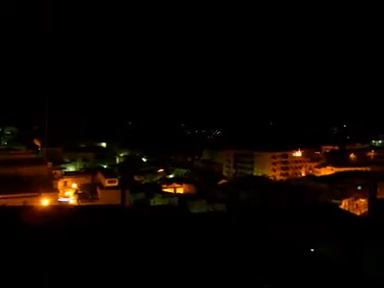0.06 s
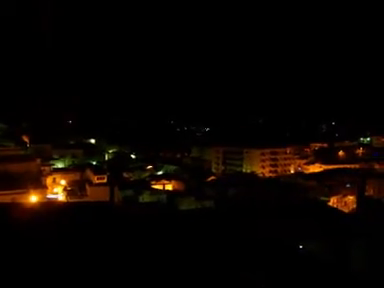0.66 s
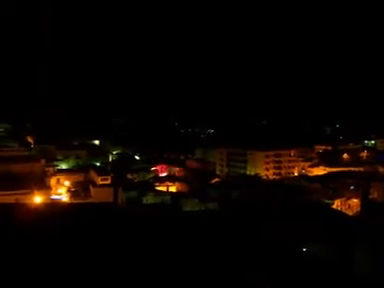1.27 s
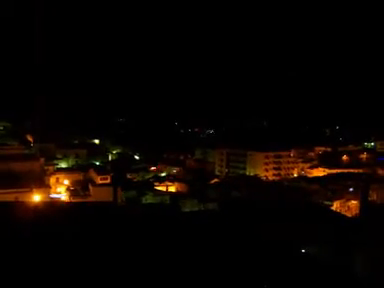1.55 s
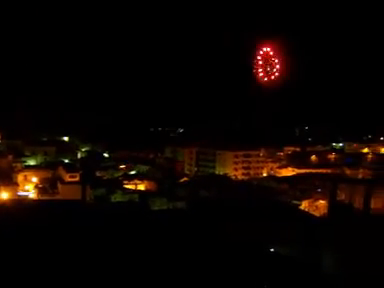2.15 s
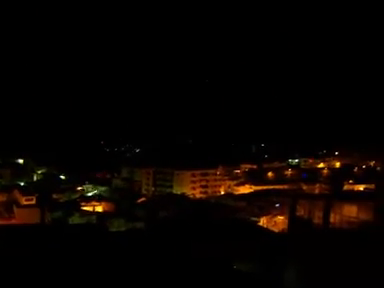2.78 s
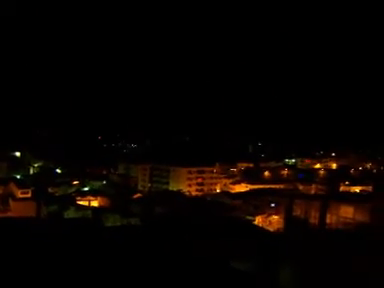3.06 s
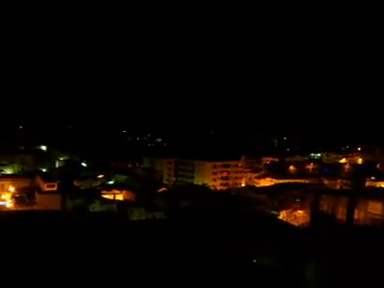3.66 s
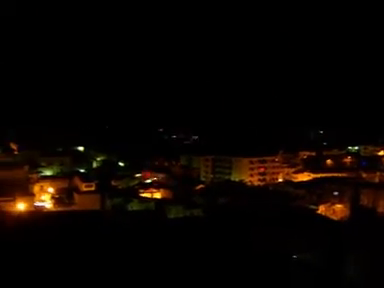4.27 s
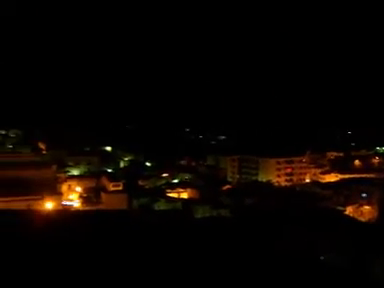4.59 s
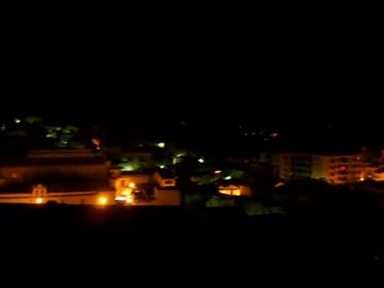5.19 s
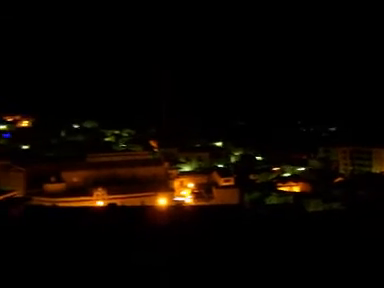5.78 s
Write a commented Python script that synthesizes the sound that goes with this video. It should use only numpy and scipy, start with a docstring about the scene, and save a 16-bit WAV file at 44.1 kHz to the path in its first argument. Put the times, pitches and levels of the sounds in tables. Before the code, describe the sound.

Fireworks go off over a town at night, heard from a hillside. Small firecracker pops and faint crackling come first, then shells burst louder and louder, slapping off buildings and rolling through the valley. The biggest adds a deep boom that overloads the microphone. A row of sharp shots follows, about two a second, with another loud burst near the end, all over a low town rumble.

```python
"""Fireworks over a town at night, heard from a hillside.
First a shell's bang rolls away through the valley, while burning pellets crackle and the town rumbles.
Firecrackers pop in the streets. More shells burst and slap back off buildings; a heavy one adds a boom.
From 1.8 s a battery (a box of firework tubes) fires a row of shots. Between them the biggest shells
burst, with pressure waves that overload the microphone. The sound stops short just after the last shot."""
import sys
import numpy as np
from scipy import signal
from scipy.fft import rfft, irfft, next_fast_len
from scipy.io import wavfile

SR = 44100
rng = np.random.default_rng(int(sys.argv[2]) if len(sys.argv) > 2 else 0)


def dump_mix(stems):
    """Bounce the given channels to the path in sys.argv[1] as a 16-bit WAV at rate SR."""
    frames = np.atleast_2d(stems).T  # one column per channel
    limited = np.clip(frames, -1, 1)  # hard clip at full scale
    pcm = np.round(limited * 32767).astype(np.int16)
    wavfile.write(sys.argv[1], SR, pcm)


N = 261954

# Shell bursts. "Clutter" is the dense mix of echoes from nearby streets; the "roll" comes from the hills.
# t/s, blast level/dB, echo f/Hz, clutter level/dB, clutter hold/s, roll level/dB, bass/dB, treble/dB
SHELL_BURSTS = [(-0.15, -10, 644, -28, 0.19, -26.5, 9, 2), (0.422, -9, 432, -23.5, 0.15, -23, 10, -7.5),
                (0.788, 0.5, 570, -21.5, 0.023, -30.5, 12.5, -4),
                (1.4022, 6.5, 678, -12.5, 0.31, -14.5, -5.5, -5.5),
                (2.1729, 10, 555, -9.5, 0.15, -16.5, -1.5, -7),
                (2.6293, 17, 451, -5.5, 0.04, -12.5, 9.5, -3), (5.3761, 10, 631, -12.5, 0.27, -11, -2, -4)]
# Tone of a shell's tail, for a shell pitched at SHELL_HZ: f/Hz, relative level/dB
SHELL_SPECTRUM = [(30, -22), (80, -25.5), (140, -13.5), (220, -10), (320, -6), (480, -0.5), (700, -1),
                  (880, -3.5), (1200, -15.5), (2000, -19.5), (3000, -24.5), (4500, -32.5), (7000, -36.5),
                  (13000, -45.5)]
# Loud echoes off large buildings: t/s, level/dB, smear/s
BUILDING_SLAPS = [(0.7906, -3, 0.0056), (1.4127, 10.5, 0.0058), (1.426, 4, 0.0043), (1.4945, 9.5, 0.007),
                  (1.526, -0.5, 0.0044), (1.5535, 2.5, 0.0052), (1.568, 0.5, 0.015), (1.6495, 7, 0.0051),
                  (2.1885, 5, 0.0047), (2.209, 4.5, 0.0032), (2.224, 5, 0.01), (2.2665, 1, 0.0044),
                  (2.2805, 2, 0.0056), (2.6336, 5, 0.014), (2.6645, 13.5, 0.0055), (2.7345, -2, 0.00094),
                  (5.402, 8, 0.0013), (5.414, 1.5, 0.0031), (5.4645, -1, 0.0033), (5.478, 5.5, 0.012),
                  (5.528, 3.5, 0.0033), (5.5395, 8, 0.006)]
# Clouds of burning pellets, called stars: t/s, burn time/s, snap rate/Hz, smallest snap at full glow/dB
STAR_CLOUDS = [(-0.1, 0.3, 240, -25), (1.0, 0.3, 190, -31), (2.95, 0.2, 530, -20.5),
               (3.42, 0.43, 93, -26.5)]
# Tone of the town's steady wash of noise: f/Hz, relative level/dB
TOWN_SPECTRUM = [(20, 6), (60, -3), (115, 1.5), (250, -6), (450, -7), (700, 2.5), (1200, -13.5),
                 (2200, -18.5), (4000, -28.5), (7000, -40), (11000, -41), (14000, -77)]
# Rise and fall of the low rumble, staying at the last value: t/s, level/dB (before RUMBLE_TRIM_DB)
RUMBLE_CURVE = [(0.0, -37), (0.28, -41), (0.83, -32.5), (1.05, -40), (2.55, -44)]
# Firecrackers, from dull pops to bright snaps: t/s, level/dB, f/Hz
FIRECRACKERS = [(0.1056, -12.5, 2200), (0.131, -19, 1890), (0.2805, -16, 580), (0.317, -24, 2100),
                (0.4513, -5, 640), (0.4693, -1, 940), (0.771, -20, 1700), (1.2149, -19, 1820),
                (3.4759, -7, 610), (4.163, -9, 685), (4.216, -12, 289), (4.436, -11.5, 540)]
# Deep thuds of the heaviest bursts: t/s, level/dB, f/Hz
HEAVY_BOOMS = [(0.793, -20.5, 111), (2.636, 1, 229)]
# Shots of the battery: t/s, level/dB
BATTERY_SHOTS = [(1.8006, 1), (2.7995, -0.5), (3.2617, -0.5), (3.7385, -0.5), (4.1264, 1), (4.5706, -1),
                 (4.9915, -2), (5.7922, -0.5)]
# Tone of a shot's tail: f/Hz, relative level/dB
SHOT_SPECTRUM = [(40, -10.5), (120, -14.5), (230, -3), (500, 1.5), (760, 1), (1000, -6), (1400, -17.5),
                 (2000, -20.5), (3000, -26.5), (5000, -35), (9000, -40), (14000, -53)]

SHELL_HZ = 600  # a typical shell; the others are tuned against it
TOWN_DB, RUMBLE_TRIM_DB = -38, 2
END_S = 5.837


def from_db(db):
    """Turn decibels into a number to multiply a sound by."""
    return 10 ** (np.asarray(db) / 20)


def fade(t, t60):
    """Stay at 1 until t = 0, then lose 60 dB every t60 seconds."""
    return from_db(-60 * np.maximum(t, 0) / t60)


def butter(x, hz, kind, order=2):
    """A Butterworth filter: keep the lows, the highs or a band, or cut a band out."""
    return signal.sosfilt(signal.butter(order, hz, kind, fs=SR, output="sos"), x)


def hollow(x, hz, db, width=1.0):
    """A resonance lifts the pitches around hz, which sounds hollow."""
    return x + (from_db(db) - 1) * signal.lfilter(*signal.iirpeak(hz, 1 / width, fs=SR), x)


def add(out, s, sound):
    """Mix a sound in, starting at s seconds."""
    at = round(s * SR)
    sound = sound[max(-at, 0):N - at]
    out[max(at, 0):max(at, 0) + len(sound)] += sound


def noise(spectrum, shift=1):
    """Noise of average power 1 with the given tone, its pitch multiplied by shift."""
    hz, db = np.transpose(spectrum)
    size = next_fast_len(N)
    bin_hz = np.maximum(np.arange(size // 2 + 1) * SR / size, 1)
    gain = from_db(np.interp(np.log(bin_hz), np.log(hz * shift), db))
    x = irfft(rfft(rng.standard_normal(size)) * gain, size)[:N]
    return x / x.std()


def lumps(per_s, depth_db):
    """Echoes arrive in clumps: a random wobble in level, of average power 1."""
    position = np.arange(N) * per_s / SR
    gain = from_db(depth_db * np.interp(position, np.arange(N // 20), rng.standard_normal(N // 20)))
    return gain / np.sqrt(np.mean(gain ** 2))


def blast(hz, cycles, smear_s, scatter, edge_hz, low_cut=0.38, hollow_db=0, crack_db=-40):
    """A pressure jump swings back and dies in a few cycles; rough surfaces smear it into many arrivals."""
    t = np.arange(SR // 10) / SR
    swing = np.sin(2 * np.pi * hz * t) * fade(t, cycles / hz)
    swing = butter(swing, min(edge_hz, SR / 3), "low", order=1)
    swing = butter(swing, hz * low_cut, "high", order=1)
    swing = hollow(swing, hz, hollow_db)
    arrivals = rng.standard_normal(len(t)) * np.exp(-(t / smear_s) ** 2)
    smeared = signal.fftconvolve(arrivals * (t > .5 / hz), swing)[:len(t)]
    smeared *= scatter * np.sqrt(smear_s * hz * np.sum(swing ** 2) / (np.sum(smeared ** 2) + 1e-20))
    # the steep fronts of the arrivals make a ragged crack
    crack = butter(butter(arrivals, 2200, "low", order=1), 1000, "high")
    return (swing + smeared) / np.abs(swing).max() + from_db(crack_db) * crack


def building_echo(hz, smear_s):
    """A building throws a blast back, hollow and smeared; higher bursts crack harder."""
    crack_db = -16.5 + 5 * np.log2(hz / SHELL_HZ)
    return blast(hz, cycles=8.2, smear_s=smear_s, scatter=0.49, edge_hz=13000, low_cut=0.21,
                 hollow_db=7.5, crack_db=crack_db)


def house_echoes(clutter_db, hold_s, hz, count=5, above_db=2.5, spread_db=1, spread_octaves=0.11):
    """Small houses answer at random while the clutter holds, each with its own strength and pitch."""
    out = np.zeros(N)
    delays = hold_s * (np.arange(count) + 1 + rng.random(count)) / (count + 1)
    for delay, (strength, tune) in zip(delays, rng.standard_normal((count, 2))):
        echo = building_echo(hz * 2 ** (spread_octaves * tune), smear_s=0.0049)
        add(out, delay, from_db(clutter_db + above_db + spread_db * strength) * echo)
    return out


def shell_tail(hz, clutter_db, hold_s, roll_db, bass_db, treble_db, build_s=0.014):
    """Nearby streets send back a dense clutter, the hills a long roll; the air takes the treble first."""
    t = np.arange(N) / SR
    sound = noise(SHELL_SPECTRUM, (hz / SHELL_HZ) ** 0.16)  # follows the burst's pitch only in part
    # filtered forwards and backwards, the bands stay in step with the whole
    bass = butter(butter(sound, 290, "low")[::-1], 320, "low")[::-1]
    treble = butter(butter(sound, 840, "high")[::-1], 1105, "high")[::-1]
    sound = sound + bass * (from_db(bass_db) - 1) + treble * (from_db(treble_db) * fade(t, t60=5.7) - 1)
    clutter = from_db(clutter_db) * fade(t - hold_s, t60=0.51)
    roll = from_db(roll_db) * fade(t, t60=3.26)
    level = np.hypot(clutter, roll)
    ringing = hollow(sound, hz=640, db=1, width=0.54)
    ringing *= sound.std() / ringing.std()
    sound = sound + (clutter / level) ** 2 * (ringing - sound)  # the clutter is hollow, the roll plain
    return sound * level * (1 - np.exp(-t / build_s)) * lumps(per_s=230, depth_db=1.97)


def shells(direct_pitch_ratio=0.87):
    """Each burst arrives directly, a little deeper than its echoes, then off buildings, then as a tail."""
    out = np.zeros(N)
    for s, db, hz, clutter_db, hold_s, roll_db, bass_db, treble_db in SHELL_BURSTS:
        direct = blast(direct_pitch_ratio * hz, cycles=3.7, smear_s=0.0064, scatter=0.18, edge_hz=1300,
                       low_cut=0.6, crack_db=-25.5)
        add(out, s, from_db(db) * direct)
        add(out, s, house_echoes(clutter_db, hold_s, hz))
        add(out, s, shell_tail(hz, clutter_db, hold_s, roll_db, bass_db, treble_db))
    for s, db, smear_s in BUILDING_SLAPS:
        last_burst_hz = [hz for start, _, hz, *_ in SHELL_BURSTS if start < s][-1]
        add(out, s, from_db(db) * building_echo(last_burst_hz, smear_s))
    return out


def star_snaps(rise_s=0.083, spread_db=4.5):
    """Random clicks thicken as a cloud of stars lights up, then thin out and weaken as it dies."""
    out, t = np.zeros(N), np.arange(N) / SR
    for s, burn_s, per_s, db in STAR_CLOUDS:
        glow = np.clip((t - s) / rise_s, 0, 1) * fade(t - s - burn_s, t60=0.9)
        sizes = from_db(db + spread_db * np.minimum(rng.exponential(size=N), 2))
        snapping = rng.random(N) < per_s * glow / SR
        out += snapping * sizes * np.sqrt(glow)
    return out


def stars(cycles=1.88, low_hz=1600, high_hz=3400, blur_db=-24):
    """Burning pellets snap, each at one of eight pitches; distance blurs them into a sizzle."""
    snaps, t = star_snaps(), np.arange(SR // 50) / SR
    pitches = np.geomspace(low_hz, high_hz, 8)
    choice = rng.integers(len(pitches), size=N)
    rings = [np.sin(2 * np.pi * hz * t) * fade(t, cycles / hz) for hz in pitches]
    crackle = sum(signal.oaconvolve(snaps * (choice == k), ring)[:N] for k, ring in enumerate(rings))
    blur = (t == 0) + from_db(blur_db) * rng.standard_normal(len(t)) * fade(t, t60=0.028)
    return butter(signal.oaconvolve(crackle, blur)[:N], [1300, 6500], "band")


def town():
    """Far fireworks and streets blend into a wash of noise, over an uneven low rumble."""
    wash = from_db(TOWN_DB) * noise(TOWN_SPECTRUM) * lumps(per_s=120, depth_db=3.0)
    rumble = noise([(15, -1), (65, 6.5), (130, -3.5), (600, -60.5)]) * lumps(per_s=12, depth_db=3.0)
    rumble_db = np.interp(np.arange(N) / SR, *np.transpose(RUMBLE_CURVE)) + RUMBLE_TRIM_DB
    return wash + from_db(rumble_db) * rumble


def firecrackers():
    """Small charges pop in the streets; the higher the pitch, the sharper the start and the crack."""
    out = np.zeros(N)
    for s, db, hz in FIRECRACKERS:
        pop = blast(hz, cycles=6.0, smear_s=0.0051, scatter=0.41, edge_hz=7.5 * hz, low_cut=0.13,
                    crack_db=-8 + 30 * np.log10(hz / 2000))
        add(out, s, from_db(db) * pop)
    return out


def booms(count=4, return_s=0.032, loss_db=6.5, deep_lag_s=0.026, deep_db=-6.5, deep_ratio=0.53):
    """A heavy burst thuds, a deeper swing follows, and both bounce across the valley, weaker each time."""
    out = np.zeros(N)
    for s, db, hz in HEAVY_BOOMS:
        for bounce in range(count):
            for lag_s, part_db, ratio in [(0, 0, 1), (deep_lag_s, deep_db, deep_ratio)]:
                thud = blast(hz * ratio, cycles=6.4, smear_s=0.013, scatter=0.65, edge_hz=300,
                             low_cut=0.57)
                add(out, s + bounce * return_s + lag_s, from_db(db + part_db - bounce * loss_db) * thud)
    return out


def battery(hz=740, wall_delay_s=0.0058, wall_db=-10, tail_db=-10, build_s=0.0025):
    """Similar shots from one spot: a clean pulse, a wall's echo, a slap, the street's answer, a roll."""
    out, t = np.zeros(N), np.arange(N) / SR
    slap = fade(t, t60=0.086)
    street = from_db(-6) * fade(t, t60=0.47)
    roll = from_db(-15) * fade(t, t60=2.15)
    level = np.hypot(slap, np.hypot(street, roll)) * (1 - np.exp(-t / build_s))
    for s, db in BATTERY_SHOTS:
        pulse = blast(hz, cycles=2.8, smear_s=0.011, scatter=0.026, edge_hz=1040, low_cut=0.19)
        add(out, s, from_db(db) * pulse)
        wall_echo = blast(hz, cycles=4.0, smear_s=0.0028, scatter=0.44, edge_hz=2200)
        add(out, s + wall_delay_s, from_db(db + wall_db) * wall_echo)
        scattered = noise(SHOT_SPECTRUM)
        knock = hollow(scattered, hz=1360, db=10.0, width=0.083) - scattered  # a hard, woody start
        tail = (scattered + knock * fade(t, t60=0.3)) * lumps(per_s=280, depth_db=2.0)
        add(out, s, from_db(db + tail_db) * level * tail)
    return out


def scene():
    """All the sounds meet at one microphone."""
    return (shells() + booms() + battery() + firecrackers() + stars() + town())[None]


def record(dry, ceiling=0.89, dip_hz=3980, dip_width_hz=600, soft_hz=9000, cutoff_hz=13900):
    """Loud bangs overload the microphone; the tone dips near 4 and 8 kHz and the highest treble is cut."""
    notched = signal.lfilter(*signal.iirnotch(dip_hz, dip_hz / dip_width_hz, fs=SR), dry)
    x = dry + 0.92 * (notched - dry)
    x = x / (1 + (x / ceiling) ** 12) ** (1 / 12)  # flattens the loudest peaks
    x = butter(x, soft_hz, "low", order=1)
    x = butter(x, [7600, 8530], "bandstop", order=3)
    x = x * np.clip((END_S - np.arange(N) / SR) / .002, 0, 1)  # the sound stops short
    return signal.sosfilt(signal.ellip(8, .1, 80, cutoff_hz, fs=SR, output="sos"), x)


dry = scene()
out = record(dry)
dump_mix(out)
```